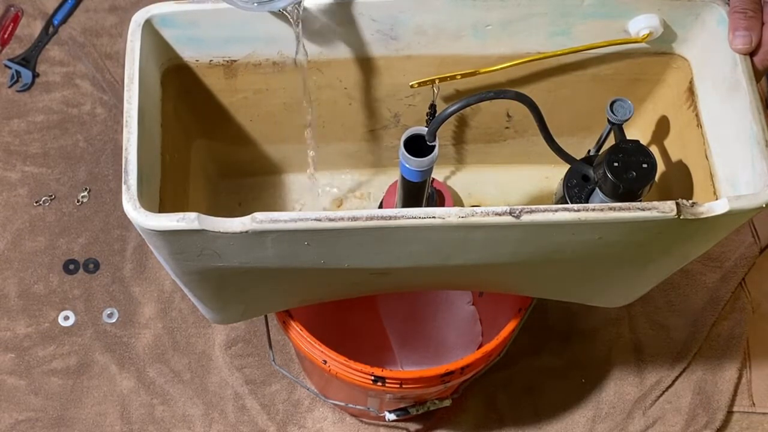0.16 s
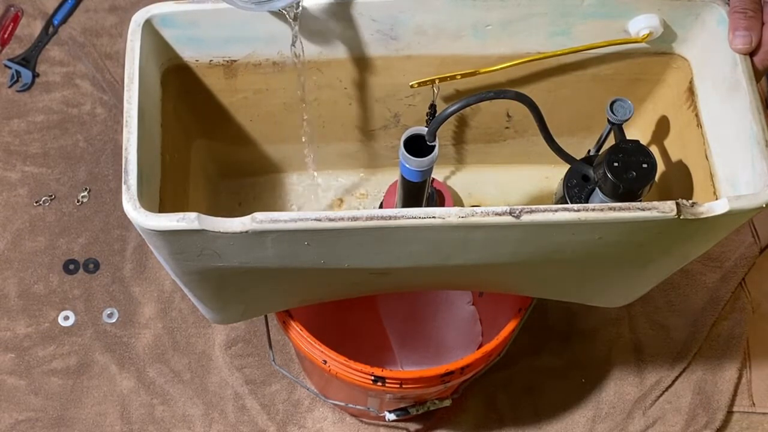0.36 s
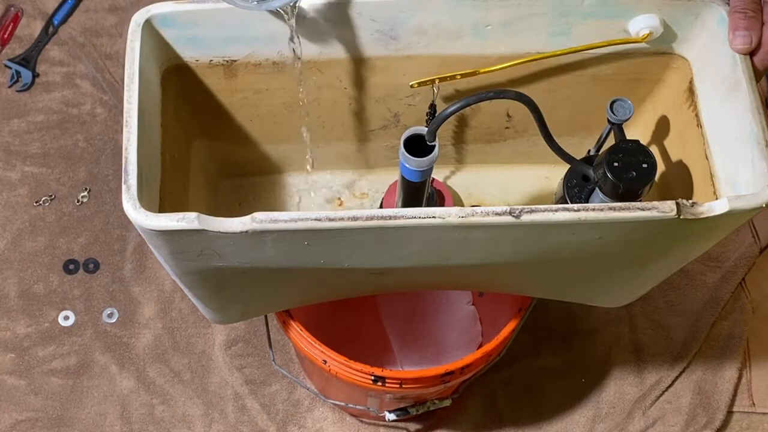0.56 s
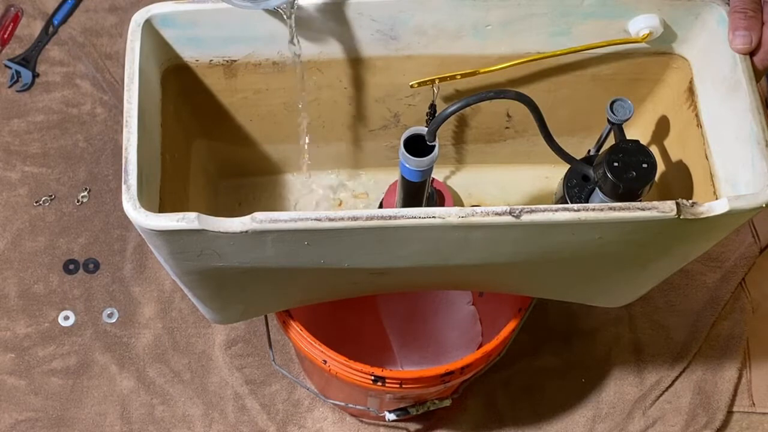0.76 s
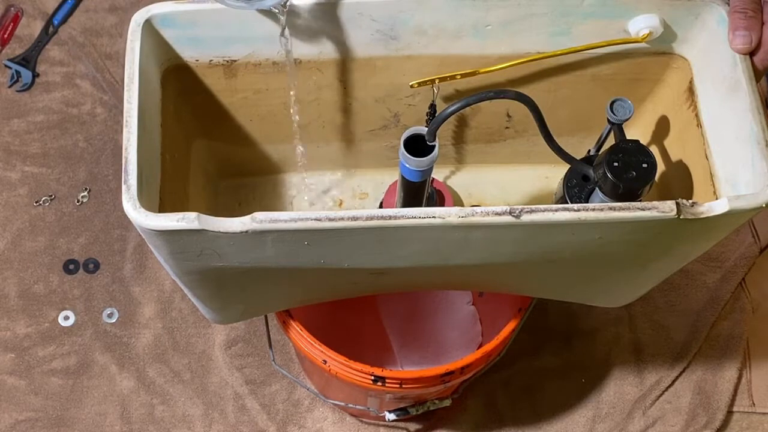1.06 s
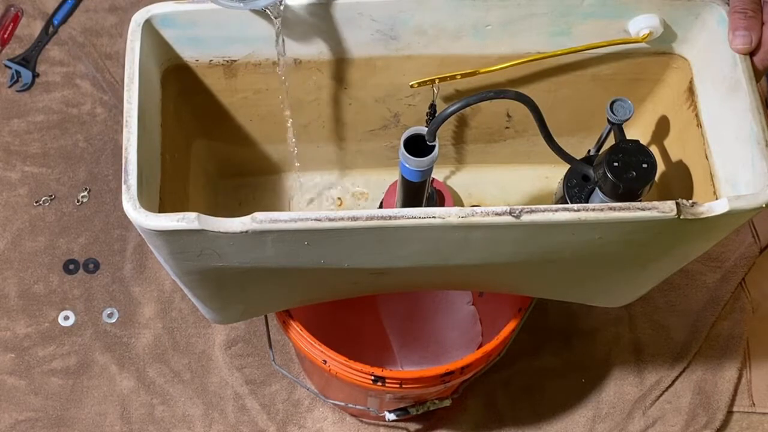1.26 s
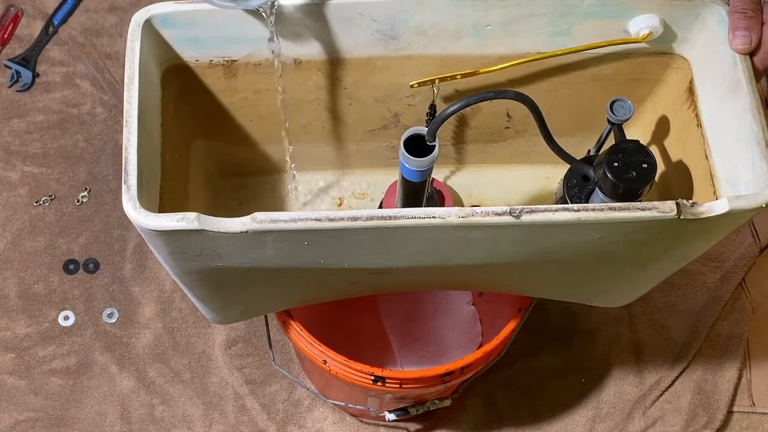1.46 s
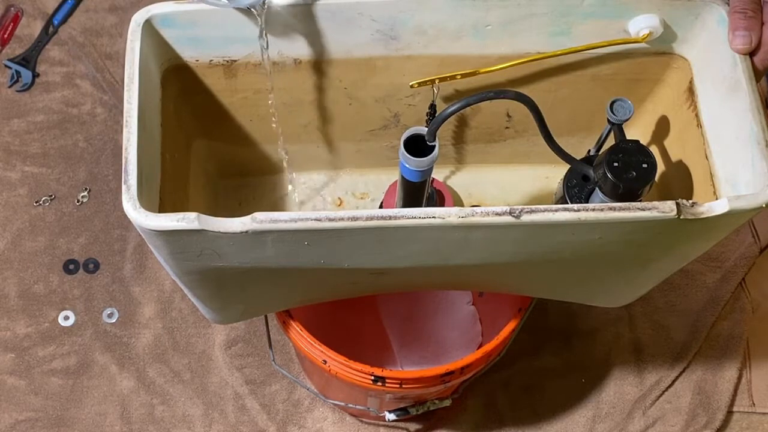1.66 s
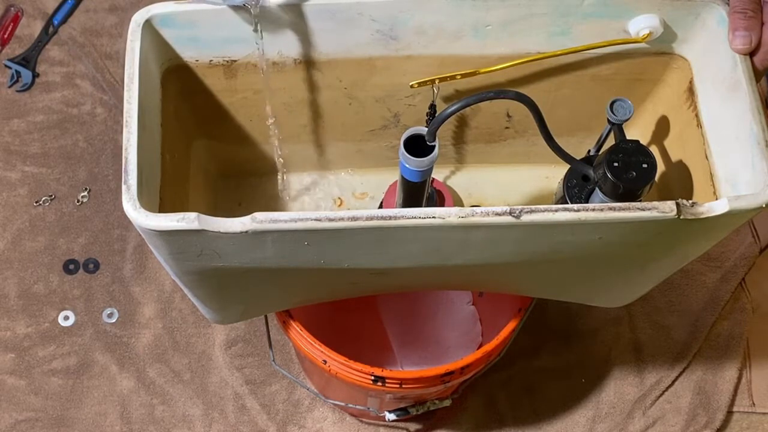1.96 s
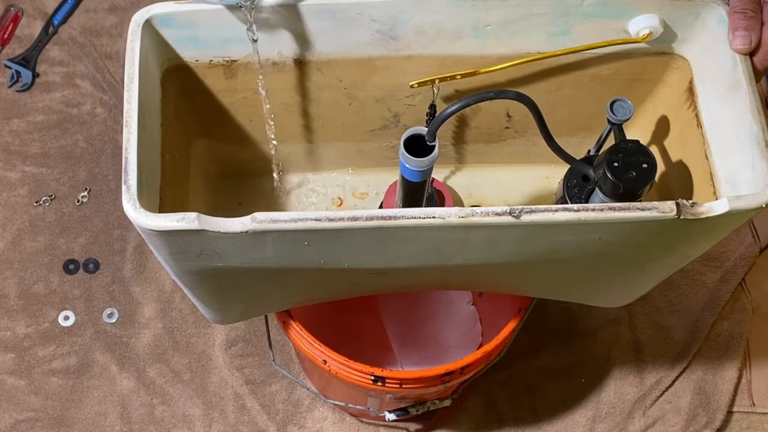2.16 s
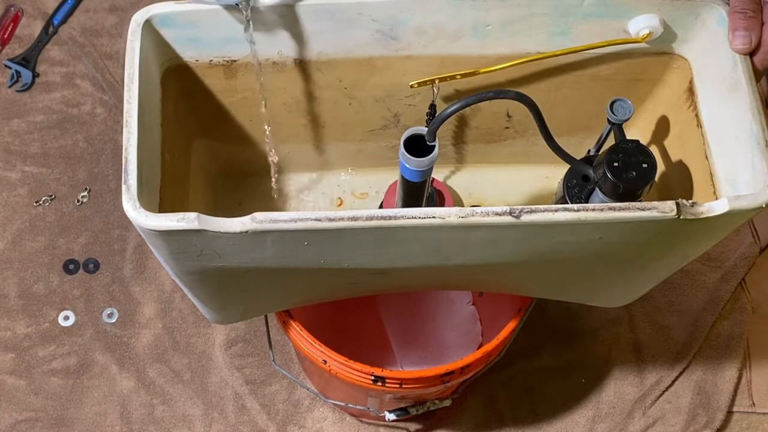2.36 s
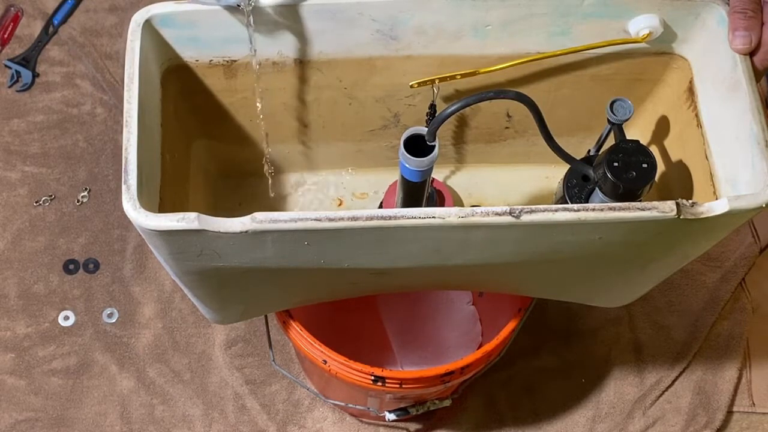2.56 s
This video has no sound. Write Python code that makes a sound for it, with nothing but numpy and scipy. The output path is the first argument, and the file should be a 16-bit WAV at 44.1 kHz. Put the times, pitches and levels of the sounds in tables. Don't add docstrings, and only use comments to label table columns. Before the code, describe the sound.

A thin stream of water splatters into a nearly empty ceramic tank, with crisp droplets, ringing bubbles and two heavy plops early on, then lighter steady splashing; close stereo microphone in a quiet, faintly rumbling room.

```python
import sys
import numpy as np
from scipy import signal
from scipy.fft import rfft, irfft
from scipy.io import wavfile
from scipy.ndimage import uniform_filter1d

SR = 44100
rng = np.random.default_rng(int(sys.argv[2]) if len(sys.argv) > 2 else 0)


def convert_level_to_amplitude(level_db):
    exponent = np.asarray(level_db, float) / 20
    return 10 ** exponent


def log_audio(samples):
    frames = np.atleast_2d(samples).T
    limited = np.clip(frames, -1, 1)
    pcm = np.round(limited * 32767).astype(np.int16)
    wavfile.write(sys.argv[1], SR, pcm)


N = 119070


def evened(x):
    return x / np.sqrt(np.mean(x ** 2) + 1e-20)


def read(points, hz):
    f, value = np.transpose(points)
    return np.interp(np.log(hz + 1), np.log(f + 1), value)


def level(points):
    return convert_level_to_amplitude(np.interp(np.arange(N) / SR, *np.transpose(points)))


def shaped(x, gain):
    hz = np.fft.rfftfreq(x.shape[-1], 1 / SR)
    return irfft(rfft(x) * gain(hz), x.shape[-1])


def wander(per_s):
    size = max(int(SR / per_s), 2)
    once = uniform_filter1d(rng.standard_normal(N), size)
    return evened(uniform_filter1d(once, size))


def add(mix, s, sound):
    part = mix[round(s * SR):][:len(sound)]
    part += sound[:len(part)]


# (frequency [Hz], level [dB per Hz])
RUMBLE_COLOUR = [(12, -15), (20, -17.5), (59, 7), (107, -8), (270, -22.5), (306, -25.5), (888, -37.5),
                 (938, -50.5), (1500, -40), (1950, -139), (3300, -120)]
# (time [s], level [dB])
RUMBLE_LEVEL = [(0.0, -40), (0.03, -50), (0.68, -47.5), (0.71, -56), (0.76, -45), (0.8, -59.5),
                (0.9, -46.5), (1.5, -55), (1.56, -47), (1.65, -54), (1.74, -48), (1.91, -49.5),
                (1.94, -65.5), (2.06, -42.5), (2.11, -52.5), (2.7, -51.5)]


def rumble():
    def colour(hz):
        return convert_level_to_amplitude(read(RUMBLE_COLOUR, hz)) * (hz > 18) / (1 + (hz / 2000) ** 4)

    low = evened(shaped(rng.standard_normal(N), colour))
    swell_db = 1 + 1.2 * wander(37)
    return level(RUMBLE_LEVEL) * convert_level_to_amplitude(swell_db) * low


# (time [s], level [dB])
FLOW = [(0, -47), (.6, -49), (.637, -56), (.66, -44.5), (.8, -44.5), (.87, -51), (.9, -40.5), (1.0, -48),
        (1.57, -50.5), (1.6, -50), (2.5, -52), (2.6, -58), (2.7, -52.5)]
# (frequency [Hz], level [dB per Hz])
FIZZ_COLOUR = [(500, -16.5), (1100, -16), (2000, -12), (3000, -2), (4300, -7.5), (7500, -5.5), (11000, -2),
               (15500, -2)]


def fizz():
    grains_per_s, spread_db, cycles, fizz_db = 2600, 3, 3.17, 2
    size = convert_level_to_amplitude(spread_db * np.minimum(rng.exponential(1, N), 4))
    size = size * (rng.random(N) < grains_per_s / SR)
    kind = rng.integers(0, 30, N)
    t, grains = np.arange(900) / SR, np.zeros(N)
    for k, hz in enumerate(np.geomspace(1300, 15500, 30)):
        longer = 1 + k % 3
        fall = t * hz / (cycles * longer)
        grain = fall * np.exp(-fall) * np.sin(2 * np.pi * hz * t * (1 + .005 * fall))
        grain = grain * hz / 4000 / np.sqrt(longer)
        grains += signal.oaconvolve(size * (kind == k), grain)[:N]
    mix = evened(grains) + rng.standard_normal(N)
    low = shaped(mix, lambda hz: 1 / (1 + (hz / 5000) ** 4))
    high = mix - low
    clumped = low * convert_level_to_amplitude(3.3 * wander(65)) + high * convert_level_to_amplitude(4.47 * wander(170))
    coloured = evened(shaped(clumped, lambda hz: convert_level_to_amplitude(read(FIZZ_COLOUR, hz))))
    return level(FLOW) * convert_level_to_amplitude(fizz_db) * coloured


# (frequency [Hz], width [Hz], level [dB])
WALLS = [(238, 17.4, -3), (274.8, 10.9, 0.5), (728.4, 23, -13.5), (886, 10.5, -14.5), (1143, 45, -16),
         (1326.5, 96, -16), (1773, 90, -16), (2320, 140, -26)]
# (time [s], level [dB])
DRUMMING = [(0, -67.5), (.18, -53.5), (.3, -66.5), (.45, -55.5), (.55, -57.5), (.62, -54), (.68, -53),
            (.8, -60.5), (.95, -60), (1.15, -62), (1.25, -66), (1.45, -64), (1.55, -64), (1.9, -64),
            (2.05, -65.5), (2.2, -62), (2.35, -75), (2.45, -66)]


def walls(jolts):
    def ring(hz):
        return sum(convert_level_to_amplitude(db) / (1 + 2j * (hz - f) / width) ** 2 for f, width, db in WALLS)

    shaking = rng.standard_normal(N) * convert_level_to_amplitude(1.5 * wander(14))
    hum = level(DRUMMING) * evened(shaped(shaking, ring))
    return hum + 200 * shaped(jolts, ring)


# (frequency [Hz], time [s])
ECHO_FADE = [(1000, 0.48), (3000, 0.11), (7000, 0.076), (14000, 0.011)]


def tank(x):
    echo_db, start_s, stir_per_s = -10.5, .0028, 130
    slots = np.arange(round(start_s * SR), 7900, 20)
    places = slots + rng.integers(0, 20, (2, len(slots)))
    signs = rng.choice([-1., 1.], (2, len(slots)))
    taps = np.zeros((2, 8000))
    np.put_along_axis(taps, places, signs, 1)
    hz, t, z = signal.stft(taps, SR, nperseg=64)
    fade = convert_level_to_amplitude(-60 * t / read(ECHO_FADE, hz)[:, None])
    tail = signal.istft(z * fade, SR, nperseg=64)[1]
    tail = tail / np.linalg.norm(tail[0])
    angle = np.pi * wander(stir_per_s)
    fed = x * np.array([np.cos(angle), np.sin(angle)])
    return convert_level_to_amplitude(echo_db) * signal.fftconvolve(fed, tail, axes=1)[:, :N].sum(0)


def bubble(t, hz, cycles, rise_s=.0003):
    fall = t * hz / cycles
    glide = 1 + .03 * (np.tanh(fall / 2) - .5)
    return (1 - np.exp(-t / rise_s)) * np.exp(-fall) * np.sin(2 * np.pi * hz * t * glide)


# (time [s], click level [dB], click frequency [Hz], level into the walls [dB])
SLAPS = [(.004, -47, 970, -53.5), (.2, -45, 694, -45), (0.3679, -40, 2450, -50), (0.5096, -46, 4500, -53),
         (0.5559, -25, 2760, -55), (0.6446, -28, 1900, -39.5), (0.674, -20, 5700, -73),
         (0.7701, -31.5, 1870, -48.5), (0.7876, -26, 3020, -54), (0.79, -20, 4800, -49),
         (.797, -31, 2300, -64), (0.81, -41, 750, -46), (0.8881, -19.5, 2420, -47.5),
         (1.1079, -40, 3050, -55), (1.3345, -46, 1200, -52), (1.5827, -49, 3030, -61),
         (1.9307, -22.5, 3500, -54.5), (2.1204, -23.5, 2930, -51), (2.174, -39, 2980, -52),
         (2.3321, -47, 3870, -58.5), (2.6354, -42, 2800, -74)]


def slaps():
    clicks, jolts, t = np.zeros(N), np.zeros(N), np.arange(400) / SR
    for s, db, hz, wall_db in SLAPS:
        add(clicks, s, convert_level_to_amplitude(db) * bubble(t, hz, cycles=1.96))
        add(jolts, s, convert_level_to_amplitude(wall_db - 4) * np.hanning(9))
    return clicks, jolts


def froth(t, hz):
    late_s, pitch_spread = .016, .17
    ratio, phase = rng.standard_normal((24, 1)), rng.random((24, 1))
    late = rng.exponential(late_s, (24, 1))
    pitch = hz * np.exp(pitch_spread * ratio)
    age = np.maximum(t - late - .002, 0)
    fall = age * pitch / 3
    pops = fall * np.exp(-fall) * np.sin(2 * np.pi * (pitch * age + phase))
    return (np.exp(-late / late_s) * pops).sum(0)


# (time [s], peak level [dB], bubble frequency [Hz], spray level against the peak [dB])
SLUGS = [(0.0477, -36, 4980, -11), (.087, -35, 7300, -6.5), (0.179, -35, 7860, -5),
         (.447, -36.5, 5000, -4), (0.475, -31, 7300, -10.5), (0.1418, -40, 6250, 2.5),
         (0.1583, -34.5, 7400, 4), (0.2179, -17, 7200, -14), (0.2521, -27, 7600, -7.5),
         (0.281, -43, 7280, -24), (0.2919, -22.5, 6970, -14.5), (0.38, -23.5, 3070, -43),
         (0.467, -28, 7200, -5.5), (0.5089, -41, 2050, 6), (0.555, -9, 7370, -16.5),
         (0.6, -33.5, 2430, -2), (0.678, -9.5, 7740, -13.5), (0.7184, -22.5, 7100, -8.5),
         (0.6252, -38, 6400, 6.5), (0.704, -35, 6800, -4), (0.7273, -15.5, 6770, -19),
         (0.7703, -29, 7040, -16), (0.7856, -25.5, 6700, -5.5), (0.828, -29.5, 7900, -7),
         (0.9103, -9, 7620, -25.5),
         (0.9772, -27.5, 7350, -4.5), (1.037, -31, 3300, -8.5), (1.1097, -19.5, 8700, -8),
                (1.1556, -30, 3360, -9.5), (1.1961, -24, 7620, -9.5), (1.255, -29, 2980, -5.5),
                (1.276, -33, 3000, -4), (1.3346, -25, 8200, -5), (1.4078, -26.5, 6000, -5),
                (1.4534, -40, 3220, 0), (1.4636, -21.5, 7760, -14.5), (1.49, -36, 7140, 1),
                (1.5341, -37, 2750, 4.5), (1.5636, -30.5, 2800, -9), (1.5821, -13.5, 7760, -15),
                (1.5992, -28.5, 4700, -7), (1.648, -33.5, 3050, -8), (1.6818, -43.5, 5160, 6),
                (1.717, -19.5, 6900, -6), (1.7906, -23.5, 8100, -5.5), (1.855, -27, 5400, -14.5),
                (1.8713, -27.5, 5700, -5),
         (1.9324, -11, 5900, -17.5), (1.95, -18, 6640, -22), (1.991, -32, 2710, -3),
             (2.0169, -29, 6900, -10), (2.0497, -39.5, 7200, 5.5), (2.0689, -31, 3180, 0),
             (2.09, -39, 6500, -4), (2.1203, -32, 5580, -1.5), (2.1455, -31.5, 3020, -9),
             (2.1803, -29, 8300, -2), (2.233, -20, 6730, -11.5), (2.259, -18, 6650, -12.5),
             (2.3057, -37.5, 6700, -2), (2.3323, -33, 4950, -4.5), (2.3588, -18, 5640, -32),
             (2.375, -26.5, 6200, -16), (2.4088, -24, 8500, -6.5), (2.4301, -29, 8160, -2),
             (2.4528, -34, 7740, 0), (2.4745, -29, 3065, -1.5), (2.4934, -42, 2420, 8.5),
             (2.5152, -37.5, 6300, 0), (2.5393, -39.5, 7240, 3.5), (2.6633, -27.5, 3300, -16),
             (2.6804, -22, 8300, -16)]
# (time [s], peak level [dB], bubble frequency [Hz],
# spray level against the peak [dB], bubble length [cycles])
PLOPS = [
    (0.6456, -0.5, 2825, -18, 2.8),
    (0.8882, 0, 3364, -20.5, 1.85),
]
# (time [s], peak level [dB], frequency [Hz])
GLUGS = [(0.319, -41, 3310), (0.4478, -45, 2650), (0.531, -38.5, 2960), (0.814, -40, 1827),
         (.894, -30.5, 3390), (0.957, -43, 1770), (0.98, -37.5, 2620), (1.257, -39, 2280),
         (1.365, -39, 2720), (1.436, -44, 2860), (1.6183, -41, 3240), (1.6596, -41, 2830),
         (1.6931, -33, 2780), (1.7927, -38, 2860), (1.8584, -29.5, 3180), (1.981, -39, 2690),
         (2.193, -37, 4600), (2.2543, -47, 3040), (2.259, -38, 4610), (2.27, -38, 4500), (2.36, -31, 4480),
         (2.50, -44, 2320)]
# (frequency [Hz], level [dB per Hz])
SPRAY_COLOUR = [(600, -25.5), (1500, -15), (3000, -12), (4300, -9.5), (7500, -2), (8600, -1), (11000, 0),
                (15500, -0.5)]


def slugs():
    spray_db, bubble_db, froth_db, plop_froth_db = 6, -2.5, -18.5, -7.5
    tick_db, tick_s, bubble_late_s = 4.5, .00025, .00055
    spray_gain, bubbles, t = np.zeros(N), np.zeros(N), np.arange(2600) / SR
    burst_fall = np.exp(-t / .0027) + convert_level_to_amplitude(-27) * np.exp(-t / .015)
    burst = (1 - np.exp(-t / .0012)) * burst_fall
    burst += convert_level_to_amplitude(tick_db) * t / tick_s * np.exp(-t / tick_s)
    for s, db, hz, slug_spray_db, *plop_cycles in PLOPS + SLUGS:
        cycles = plop_cycles[0] if plop_cycles else 5
        slug_froth_db = froth_db + (plop_froth_db if plop_cycles else 0)
        add(spray_gain, s, convert_level_to_amplitude(db + slug_spray_db + spray_db) * burst)
        add(bubbles, s + bubble_late_s, convert_level_to_amplitude(db + bubble_db) * bubble(t, hz, cycles))
        add(bubbles, s, convert_level_to_amplitude(db + slug_froth_db) * froth(t, hz))
    for s, db, hz in GLUGS:
        add(bubbles, s, convert_level_to_amplitude(db) * bubble(t, hz, cycles=11, rise_s=.001))
    spray = shaped(spray_gain * rng.standard_normal(N), lambda hz: convert_level_to_amplitude(read(SPRAY_COLOUR, hz)))
    wobble = 1 + .45 * np.tanh(wander(1500))
    return spray + bubbles * wobble


def scatter(x):
    taps = rng.standard_normal((2, 600)) * np.exp(-np.arange(600) / SR / .003)
    taps = taps / np.linalg.norm(taps[0])
    a, b = signal.fftconvolve(x[None], taps, axes=1)[:, :N]
    angle = np.pi * wander(5)
    return np.cos(angle) * a + np.sin(angle) * b


# (frequency [Hz], likeness [0-1])
SAME = [(60, 0.95), (250, 0.86), (700, 0.64), (1200, 0.42), (1800, 0.9), (2500, 0.95), (4200, 1),
        (7000, 0.95), (9000, 0.88), (15000, 0.99)]
# (frequency [Hz], phase [turns])
LEAD = [(900, 0), (1700, -.06), (3300, -.05), (4000, 0), (7150, 0), (11100, 1.0), (15300, 2.0)]


def scene():
    def same(hz):
        return np.clip(read(SAME, hz), 0, 1)

    def lead(hz):
        return np.exp(2j * np.pi * np.interp(hz, *np.transpose(LEAD)))

    clicks, jolts = slaps()
    water = fizz() + clicks + slugs()
    sound = rumble() + water + walls(jolts) + tank(water)
    shared = shaped(sound, lambda hz: np.sqrt((1 + same(hz)) / 2))
    differing = shaped(scatter(sound), lambda hz: np.sqrt((1 - same(hz)) / 2))
    return np.array([shared + differing, shaped(shared - differing, lead)])


def top_cut(x):
    return signal.sosfilt(signal.butter(12, 17140, fs=SR, output="sos"), x)


# (channel [0 sum, 1 difference], low edge [Hz], high edge [Hz], share of time [0-1])
GATES = [(0, 8700, 9400, .25), (0, 13000, 13700, .25), (0, 15900, 22050, .85), (1, 2100, 3900, .75),
         (1, 3900, 7400, .6), (1, 10900, 11500, .3), (1, 15900, 22050, .85)]


def record(dry):
    x = shaped(dry, lambda hz: 1 / (1 + (hz / 15900) ** 40))
    hz, t, z = signal.stft([x[0] + x[1], x[0] - x[1]], SR, nperseg=1024)
    for which, low_hz, high_hz, share in GATES:
        band = (hz > low_hz) & (hz <= high_hz)
        power = uniform_filter1d((abs(z[which, band]) ** 2).sum(0), size=3)
        z[which, band] *= power > np.quantile(power, share)
    mid, side = signal.istft(z, SR, nperseg=1024)[1][:, :N]
    mix = np.array([mid + side, mid - side]) / 2
    return top_cut(mix)


dry = scene()
out = record(dry)
log_audio(out)
```